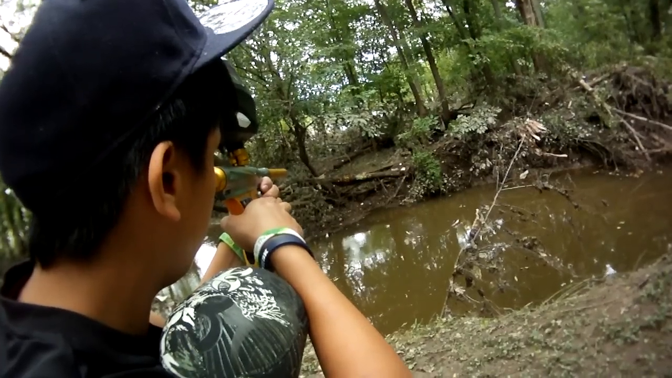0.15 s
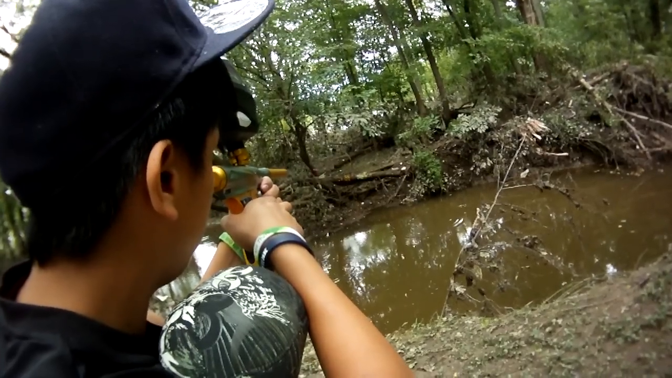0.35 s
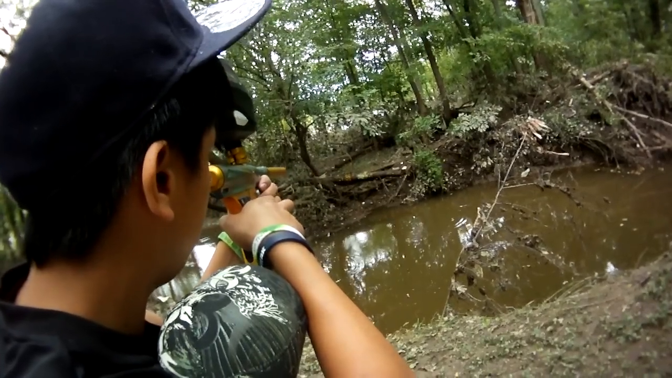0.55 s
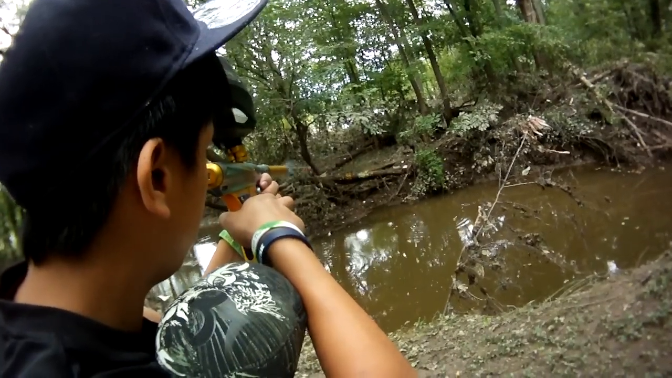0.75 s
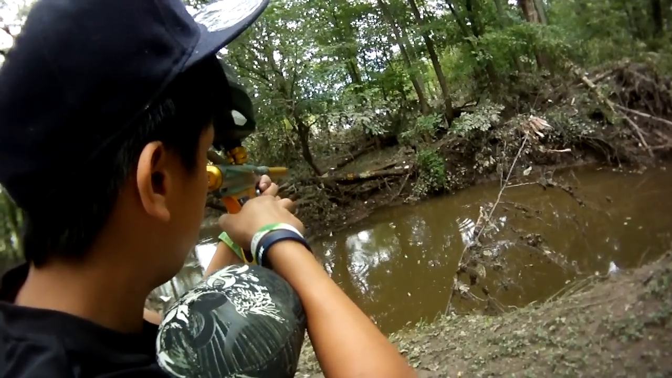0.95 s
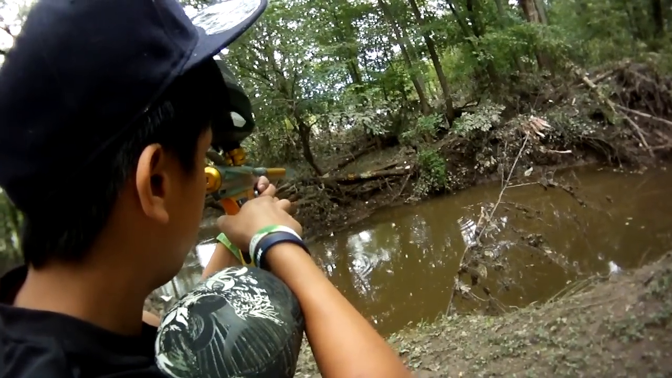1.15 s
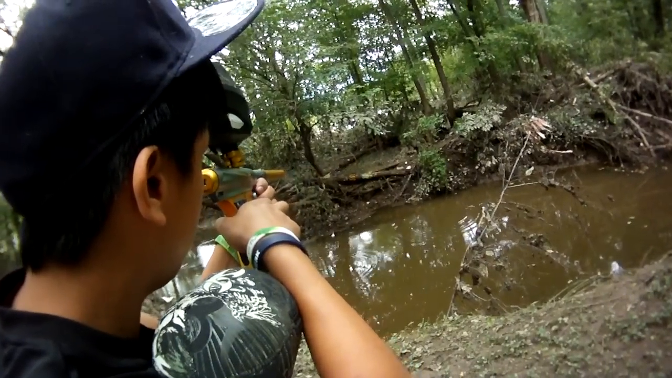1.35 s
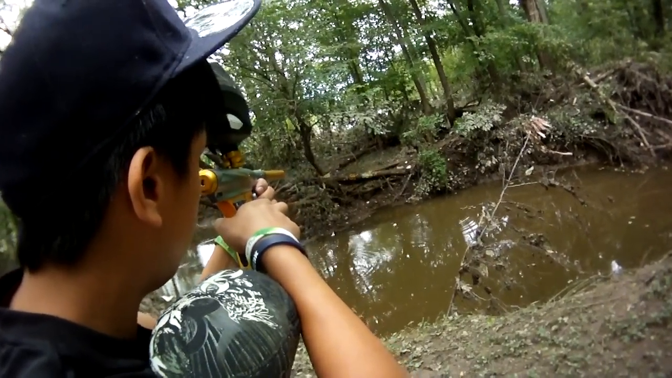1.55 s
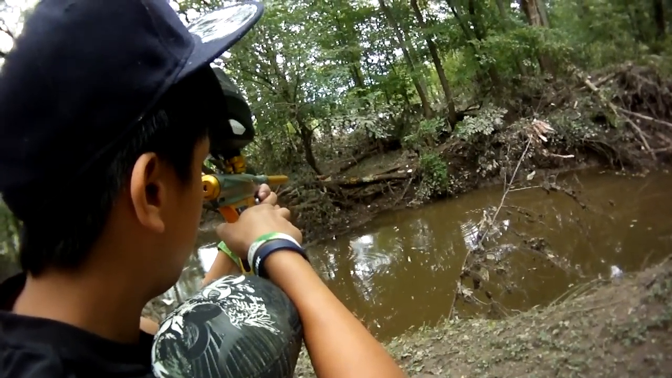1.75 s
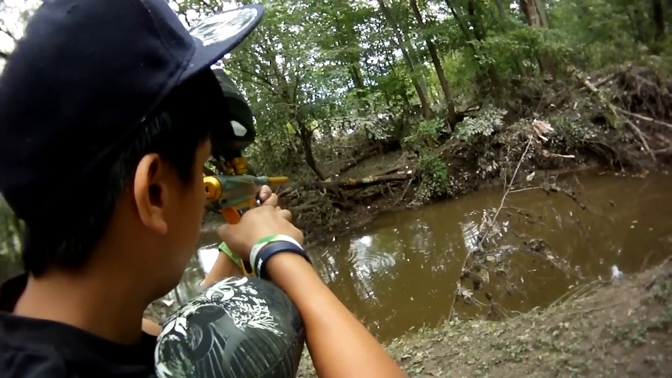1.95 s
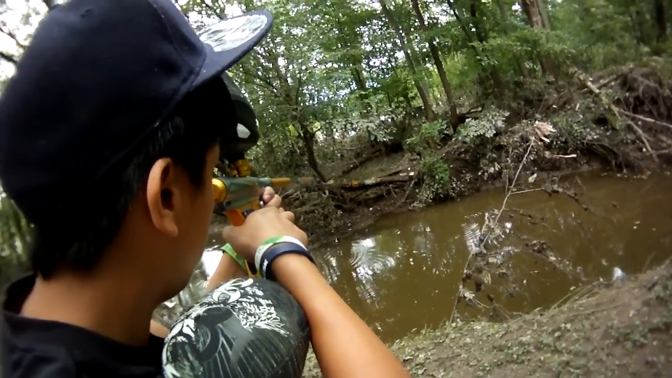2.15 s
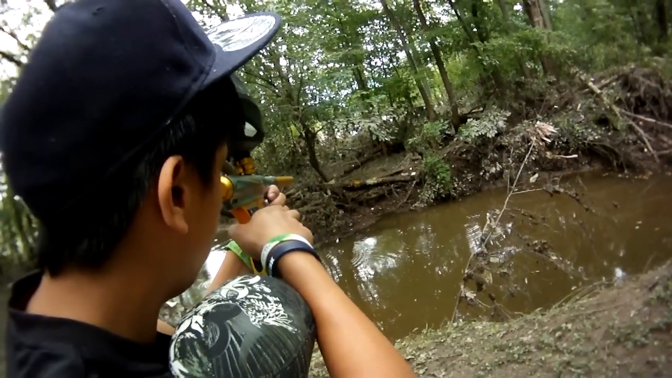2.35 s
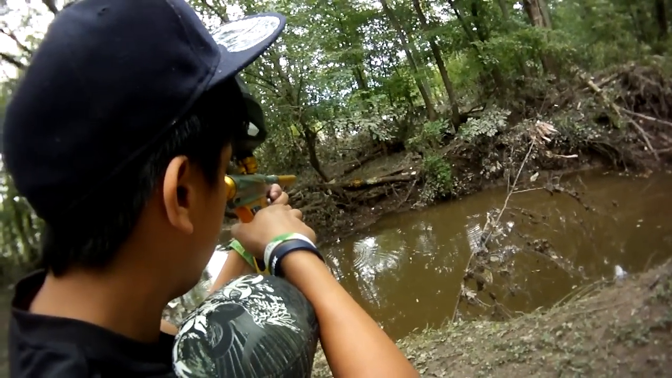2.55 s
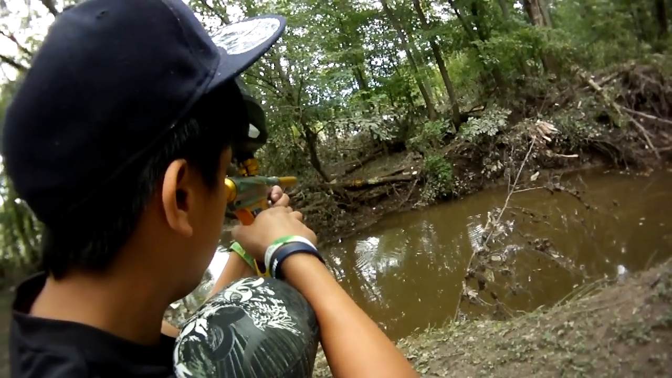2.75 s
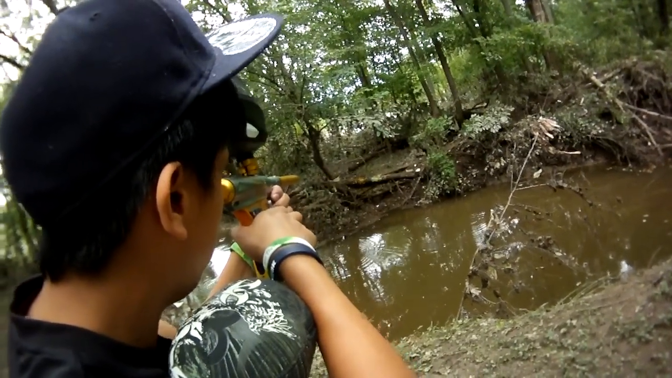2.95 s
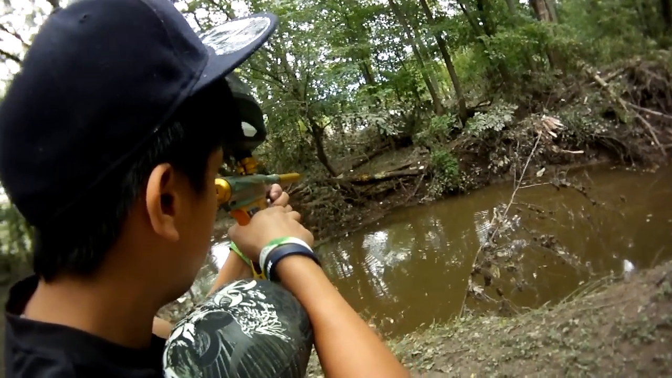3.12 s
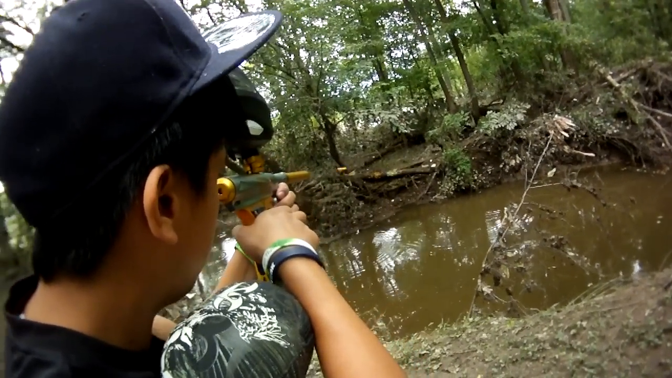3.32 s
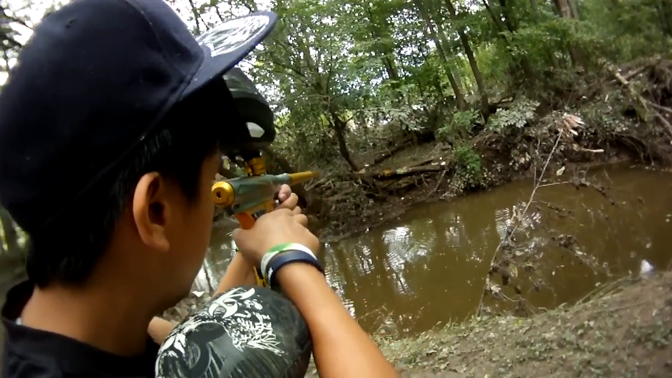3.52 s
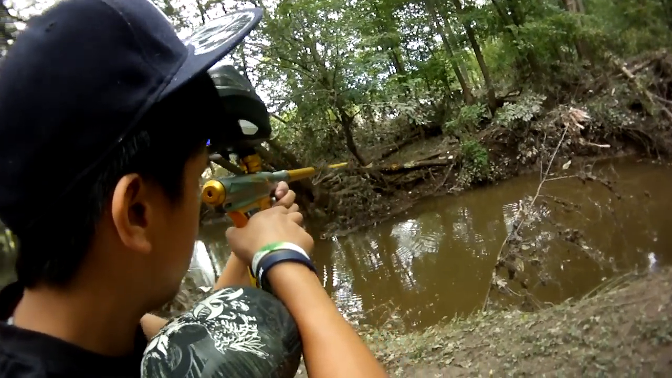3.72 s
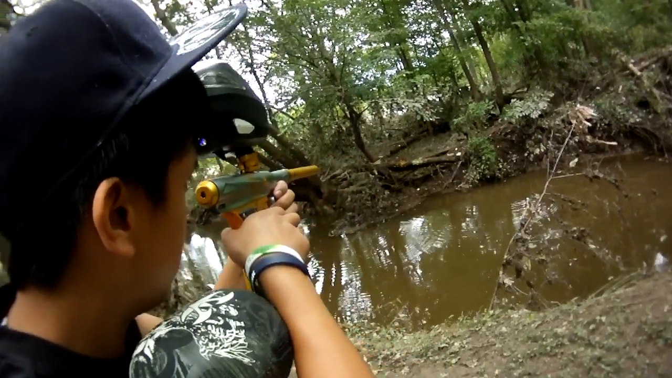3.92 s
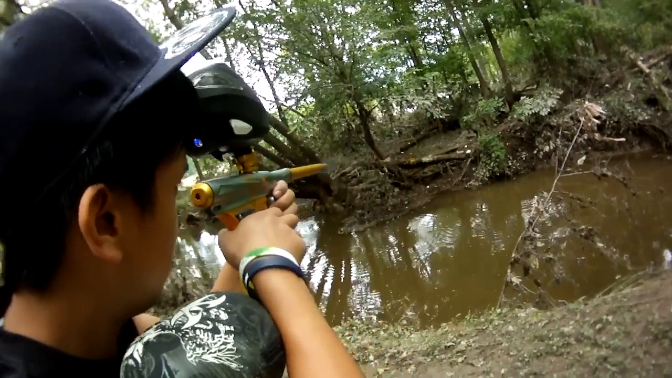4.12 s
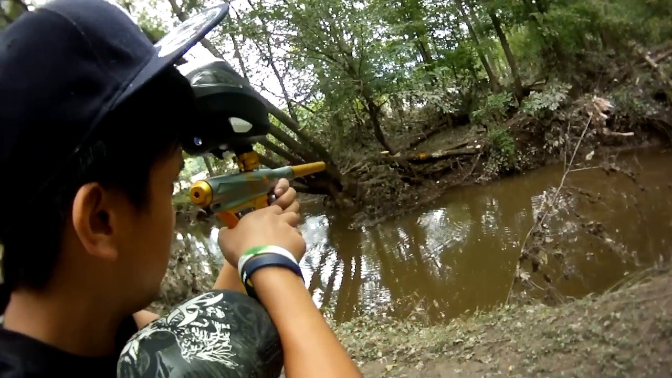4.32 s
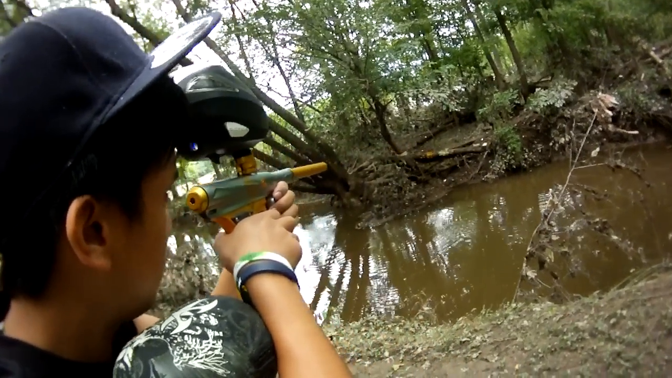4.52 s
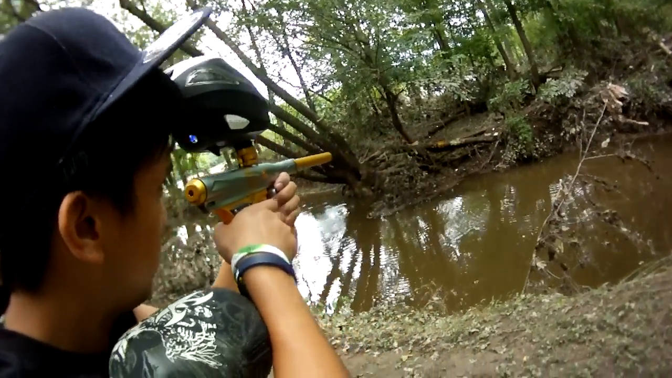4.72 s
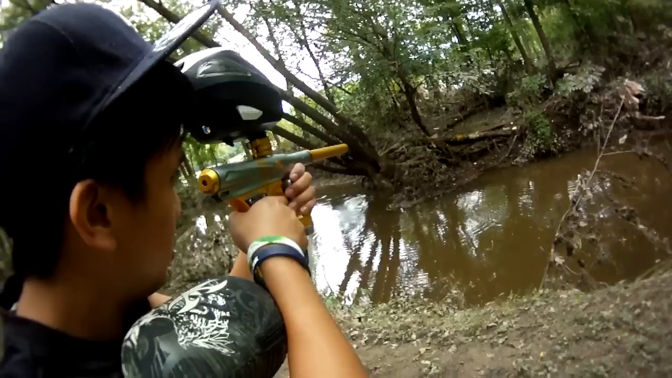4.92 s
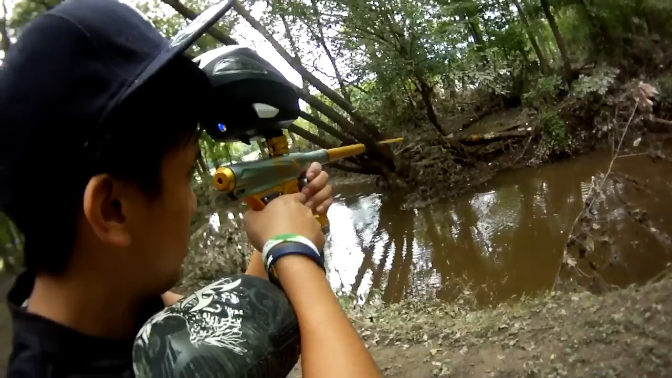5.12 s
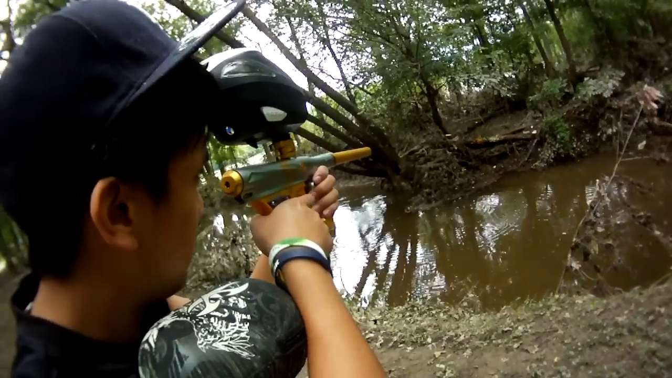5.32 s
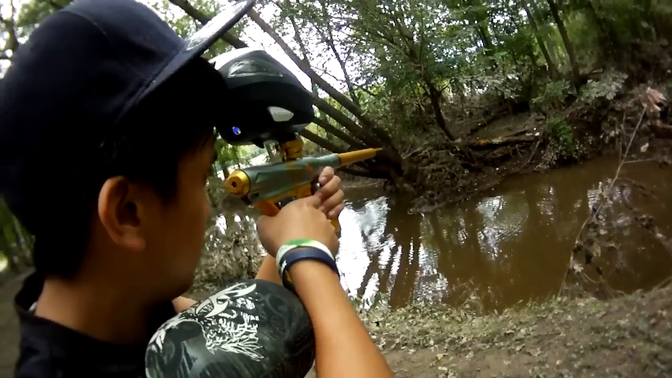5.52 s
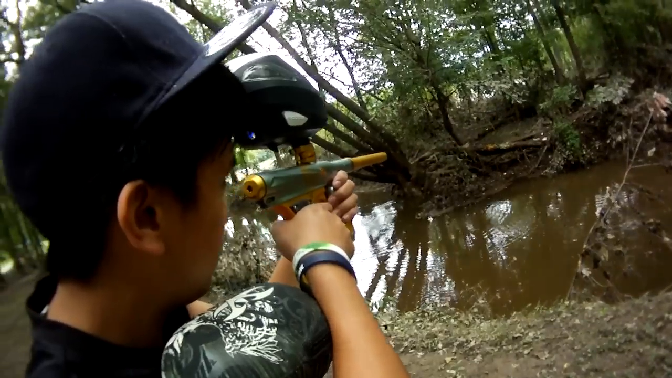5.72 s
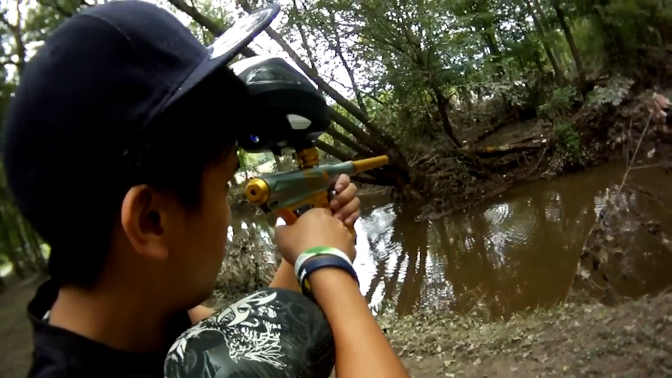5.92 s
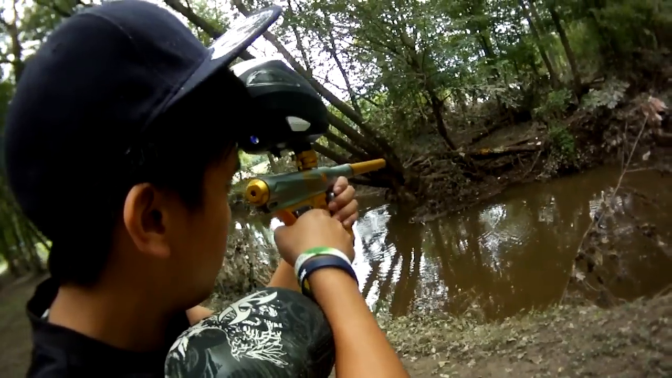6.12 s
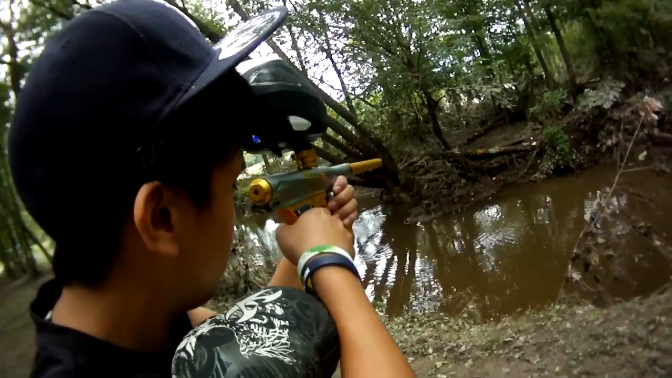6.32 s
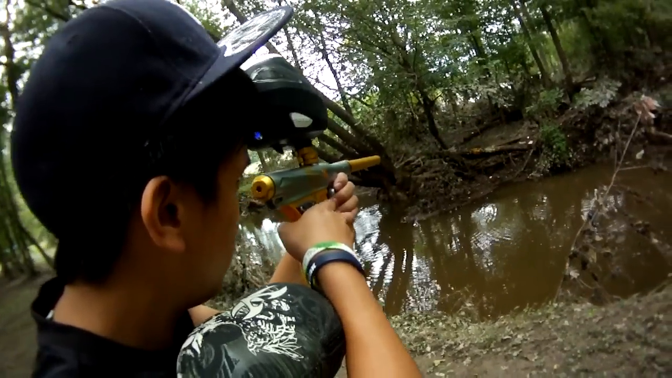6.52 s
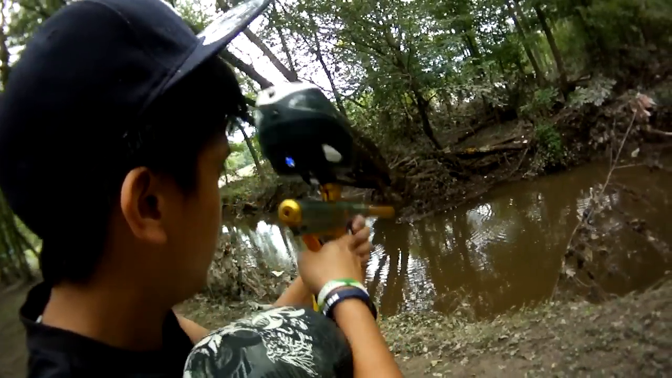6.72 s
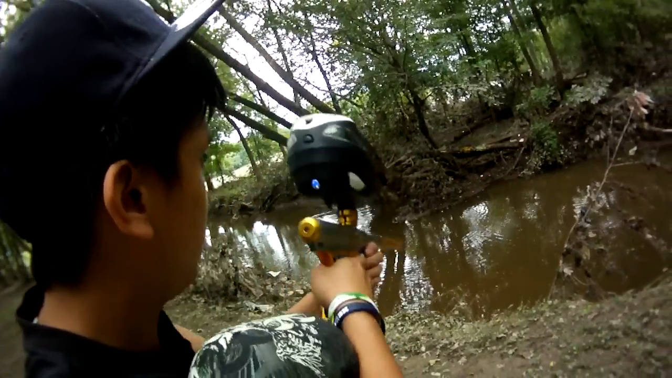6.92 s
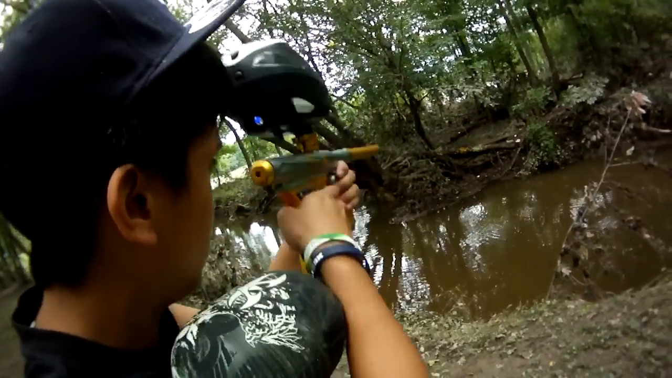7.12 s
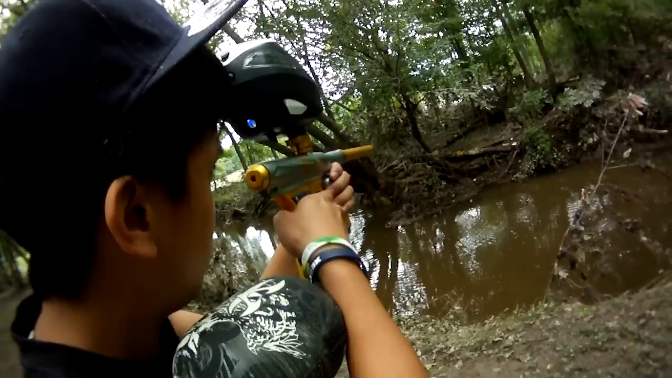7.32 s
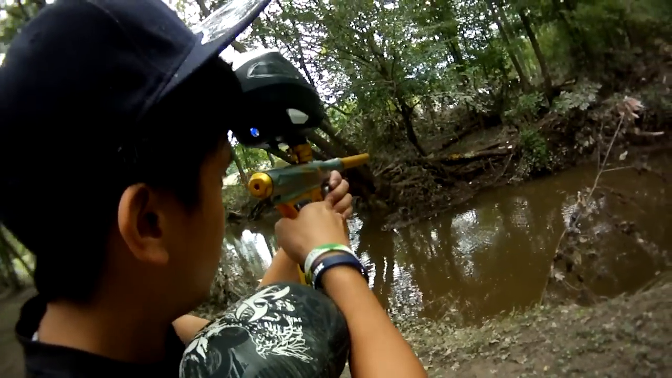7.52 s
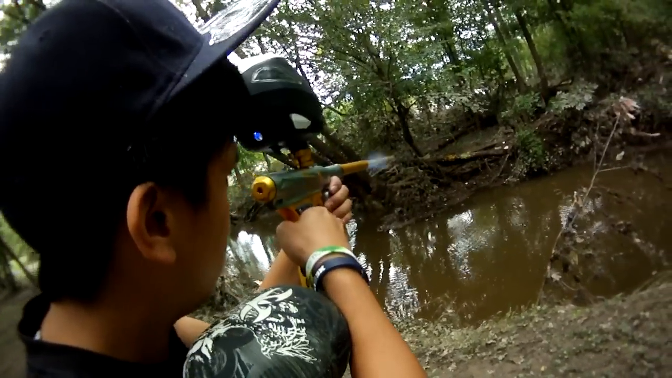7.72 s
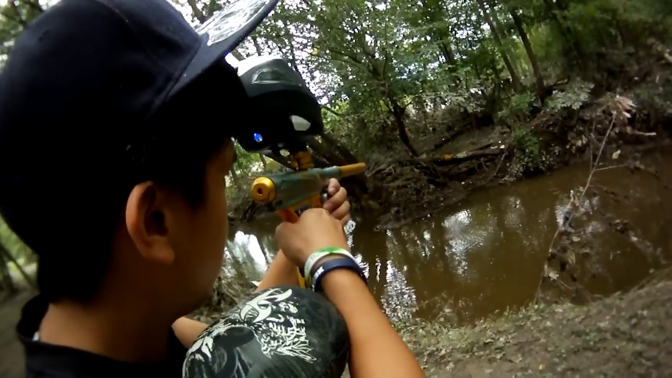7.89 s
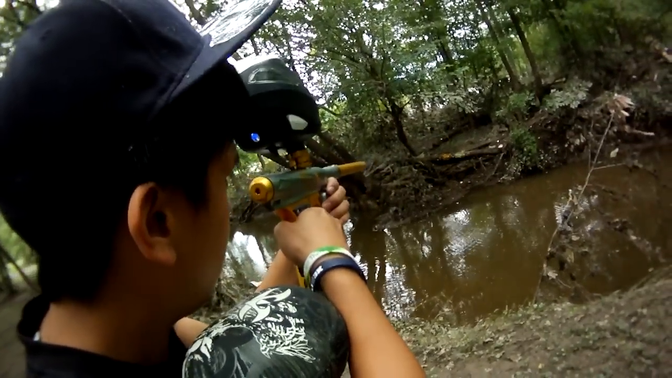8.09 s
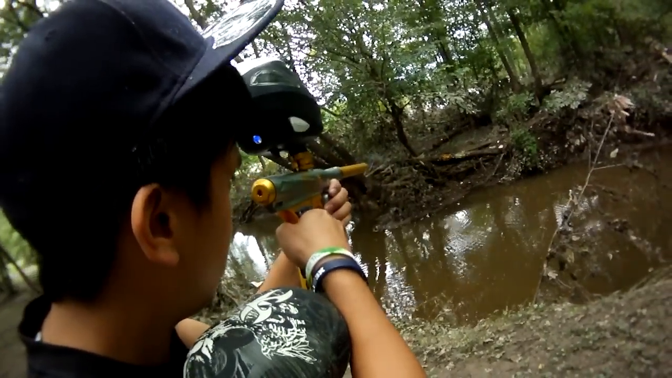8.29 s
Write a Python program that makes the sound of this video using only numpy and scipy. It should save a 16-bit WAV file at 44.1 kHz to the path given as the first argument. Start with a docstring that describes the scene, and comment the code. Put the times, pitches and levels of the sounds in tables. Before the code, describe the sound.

A steady machine-like run of compressed-air pops and bolt clacks begins at once, close to the microphone, with small splatting cracks farther off among the trees. It loses its beat briefly and ends abruptly. Near-quiet woods remain, with short echoes fading and light hopper rattles, before three punchier, hissing single shots ring out, spaced about a quarter second apart.

```python
"""A paintball marker fires twelve shots a second across a creek in the woods, falters and stops,
is tilted with faint ticks and rattles, then fires three harder single shots.
Each shot: the bolt thuds off and gas hisses, a chirp falls along the barrel, the muzzle pops, surges and
jets, the bolt clacks home; barrel and hopper ring on. Pulses, decaying sines and coloured noise make these.
Sparse echoes from earth, far bank and trees follow; some balls burst on wood. A faint hush runs throughout."""
import sys
import numpy as np
from scipy import signal
from scipy.fft import rfft, irfft
from scipy.io import wavfile

SR = 44100
rng = np.random.default_rng(int(sys.argv[2]) if len(sys.argv) > 2 else 0)


def inscribe(sig):
    """Save sig as 16-bit PCM at rate SR to the path in sys.argv[1].

    A 1-D sig is mono; a 2-D sig holds one channel per row.
    Samples are clipped to [-1, 1] before scaling.
    """
    pcm = np.round(np.clip(np.atleast_2d(sig).T, -1, 1) * 32767)
    wavfile.write(sys.argv[1], SR, pcm.astype(np.int16))


N = 368235
AGE_S = np.arange(6000) / SR  # time axis of every short sound

# Hush of the woods. Each row: frequency in Hz, relative density in dB per Hz.
AIR_COLOUR = [(25, -10.5), (70, 5.5), (140, -3), (220, -4), (500, 2.5), (800, -6), (1250, -9.5), (2500, -9),
              (3200, -13), (4100, -9.5), (5700, -19.5), (6900, -11.5), (9000, -20.5), (15500, -25)]
AIR_DB = -60.5
# Decay among the trees. Each row: frequency in Hz, t60 in seconds.
WOODS_T60 = [(100, 1), (500, 0.82), (2500, 1), (4500, 1), (8000, 1), (14000, 0.24)]
# Return from trunks and leaves. Each row: frequency in Hz, relative level in dB.
SCATTER_COLOUR = [(100, 3), (300, -2), (520, 2.5), (1000, 0.5), (2500, 0), (3700, 6.5), (4400, 3.5),
                  (5600, 5), (7000, 1.5), (12000, -9)]
# Dull reflections from the earth. Each row: delay in seconds, gain in dB.
GROUND_ECHOES = [(0.0089, -13), (0.027, -19.5)]

# Shifts of balls in the hopper and handling clicks at set times.
# Each row: start in seconds, level in dB, decay time constant in seconds.
RATTLES = [(6.798, -54, 0.026), (6.821, -47.5, 0.031), (7.275, -54.5, 0.033), (7.374, -56.5, .014),
           (7.953, -49, 0.0018)]
# Colour of the rattles. Each row: frequency in Hz, relative density in dB per Hz.
RATTLE_COLOUR = [(200, -13), (550, 5), (1100, -7), (2500, 0.5), (4200, -4.5), (5700, -11), (7000, -8),
                 (10000, -31), (15000, -32)]
# Faint ticks while the marker is tilted.
STIR_FROM_S, STIR_TO_S, STIR_DB, STIR_DECAY_S = 6.72, 7.26, -58, 0.0069

# Balls bursting on branches and the bank at set times, most of them loud.
# Each row: start in seconds, level in dB.
SPLATS = [(.547, -47), (.621, -45), (0.949, -40), (1.209, -42), (1.536, -41), (1.701, -42), (1.78, -40.5),
          (1.946, -43), (2.029, -41.5), (6.125, -45.5), (6.232, -54)]
# Colour of a bursting ball. Each row: frequency in Hz, relative density in dB per Hz.
SPLAT_COLOUR = [(300, -7), (1200, -14), (2500, 4), (3300, -1), (4100, 6), (5600, -9), (7000, -1),
                (9000, -22), (15000, -44)]
# Level of the other bursts, swelling over the first two seconds, then dropping back.
# Each row: time in seconds, level in dB.
HIT_LEVEL = [(0.0, -51), (2.1, -44), (2.3, -50), (6.0, -49)]
HIT_SHARE, FLIGHT_S, FLIGHT_SCATTER_S = 0.41, 0.37, 0.008  # share: chance of such a burst per shot

# Ring of the hollow hopper as it empties.
# Each row: time in seconds, level in dB against the surge, mean pitch in Hz.
HOLLOW = [(0.0, -10, 484), (2.0, -11, 493), (4.0, -11, 508), (5.5, 0, 527), (8.2, -6.5, 503)]
CLATTER_DB = -56  # mean
# Barrel tube: mean pitch, decay, level at the usual jet level, dB per dB of jet.
TUBE_HZ, TUBE_DECAY_S, TUBE_DB, TUBE_PER_JET = 2430, 0.03, -46, 2.5

# Thuds as the bolt sets off. Each row: delay in seconds, level in dB against the first, pitch in Hz.
STROKE = [(0.0, 0, 440), (0.0063, -5.5, 460)]
# Modes of the marker's body. Each row: mean frequency in Hz, mean relative level in dB, t60 in seconds.
BODY = [(1051, -13, 0.041), (1415, -25.5, 0.071), (1550, -26, 0.076), (2396, -15, 0.045), (2423, -28, 0.14),
        (2640, -22, 0.035), (3637, -4, 0.026), (3850, -3, 0.027), (4288, 2.5, 0.019), (4372, 1.5, 0.027),
        (4450, 4, 0.014), (6630, -4.5, 0.017), (7900, -21, 0.065)]
# Colour of the valve's hiss. Each row: frequency in Hz, relative density in dB per Hz.
VALVE_COLOUR = [(200, -72), (600, 5.5), (1050, 1.5), (1400, -9), (2500, 0.5), (3200, -4), (4300, 1.5),
                (5600, -16), (6800, 0.5), (8000, -9.5), (10000, -18), (15500, -61)]
# Colour of the bolt's clack. Each row: frequency in Hz, relative density in dB per Hz.
CLACK_COLOUR = [(200, -26.5), (600, 1.5), (1050, -10.5), (1300, -19), (1550, -6.5), (1850, -18.5),
                (2450, -2), (3100, -11.5), (4200, -4), (5600, -20.5), (7100, -8.5), (9000, -11),
                (11500, -25), (13000, -28), (15500, -69)]

# Surges of gas behind the ball. Each row: delay in seconds, relative level in dB, pitch in Hz.
SURGES = [(0.0, -1.5, 430), (0.0022, -9.5, 716), (0.0039, -12, 398)]
# Colour of the air jet. Each row: frequency in Hz, relative density in dB per Hz.
JET_COLOUR = [(200, -60), (700, -14), (1100, -10.5), (1300, -6), (1600, -4), (1900, -12), (2500, -0.5),
              (3200, -7), (4400, 1.5), (5700, -8), (6900, 5), (8500, -11.5), (10500, -20), (13000, -26.5),
              (15500, -73)]
# Muzzle hiss, narrow around its whistle. Each row: frequency in Hz, relative density in dB per Hz.
WHISTLE_COLOUR = [(4000, -25), (7600, -14), (8400, -3), (8800, 0), (9200, -21), (10200, -31), (15000, -43)]

FIRST_S, CYCLE_S, STREAM_COUNT = 0.0082, 0.082383, 69  # the steady stream
# Ordinary pops, sagging as the air supply tires. Each row: time in seconds, reference level in dB.
POP_LEVEL = [(0.0, -32.5), (1.1, -31.5), (1.6, -33.5), (2.0, -32.5), (3.0, -32), (4.2, -33), (4.6, -34),
             (5.6, -36)]
POP_SCATTER_DB, USUAL_POP_DB = 0.72, -31.5
# Harder shots of the stream. Each row: time in seconds, pop reference level in dB.
HARD_SHOTS = [(0.42, -29), (0.75, -30.5), (0.997, -29.7), (2.48, -29), (2.562, -27.5), (2.644, -28),
              (2.974, -27.8), (3.468, -29.5), (3.963, -27.5), (4.292, -29), (5.116, -29.5), (5.363, -31),
              (5.446, -31.5)]
# Shots off the beat, faltering and then single. Each row: pop in seconds, pop reference level in dB.
LOOSE_SHOTS = [(5.6935, -30.5), (5.7811, -31), (5.8791, -30.5), (7.7296, -25.5), (7.9901, -27.5),
               (8.215, -25.5)]
# Chirp: level at the usual pop, dB per dB of pop, gain after a pause, scatter.
CHIRP_DB, CHIRP_PER_POP, CHIRP_RESTED_DB, CHIRP_SCATTER_DB = -43, -0.6, 9.5, 2
# Surges behind a usual pop, easing in the stream. Each row: time in seconds, reference level in dB.
SURGE_LEVEL = [(0.0, -35), (2.5, -36), (5.6, -35.5)]
SURGE_PER_POP, SURGE_RESTED_DB = 0.43, 8.5  # dB per dB of pop, gain after a pause
# Jet, growing as the barrel swings out from behind the shooter's head.
# Each row: time in seconds, reference level in dB.
JET_LEVEL = [(0.0, -38), (1.95, -37.2), (2.2, -38.5), (2.9, -38.5), (3.15, -37), (3.7, -35.5), (4.5, -34),
             (5.4, -34), (8.2, -34.8)]
# Clack follows that swing less: reference level at the usual jet, dB per dB of jet, gain after a pause.
CLACK_DB, USUAL_JET_DB, CLACK_PER_JET, CLACK_RESTED_DB = -36, -33, 0.38, 4.5
# Body ring as the bolt comes home.
# Each row: time in seconds, reference level in dB, signed shot-to-shot scatter in dB.
RING_LEVEL = [(0.0, -26, 4.5), (1.99, -24.5, -1.5), (2.068, -30.5, -7.5), (3.0, -28, 1), (3.3, -27.5, 5),
              (5.8, -29.3, 6), (7.7, -29, 6)]


def amp(db):
    """Decibels to gain."""
    return 10 ** (np.asarray(db) / 20)


def at_time(points, s):
    """Straight-line reading of a two-column time table."""
    return np.interp(s, *np.transpose(points))


def read(points, hz):
    """A spectrum table on a log-frequency axis."""
    table_hz, value = np.transpose(points)
    return np.interp(np.log(hz + 1), np.log(table_hz), value)


def sized(x, db):
    """Gives a short sound the energy of 10 ms at this RMS level."""
    return amp(db) * x / np.sqrt(np.sum(x ** 2) / (SR / 100) + 1e-20)


def add(mix, start_s, sound):
    """Mixes a sound in at a time, trimmed at both ends of the scene."""
    at = round(start_s * SR)
    sound = sound[max(-at, 0):]
    part = mix[max(at, 0):][:len(sound)]
    part += sound[:len(part)]


def causal(points):
    """Minimum-phase response with this spectrum."""
    hz = abs(np.fft.fftfreq(2048, 1 / SR))
    log_gain = np.log(amp(read(points, hz)))
    spectrum = np.exp(np.conj(signal.hilbert(log_gain)))
    return np.fft.ifft(spectrum).real[:512]


def fall(decay_s, rise_s=1e-4):
    """An envelope that swells and dies exponentially."""
    return (1 - np.exp(-AGE_S / rise_s)) * np.exp(-AGE_S / decay_s)


def burst(envelope, colour, db):
    """A puff of turbulence or a spray of tiny contacts: enveloped noise in one colour."""
    noise = envelope * rng.standard_normal(len(AGE_S))
    return sized(signal.fftconvolve(noise, colour)[:len(AGE_S)], db)


def thud(hz, swell_s, db):
    """A pressure pulse: a sine under an envelope that peaks at twice its swell time."""
    u = AGE_S / swell_s
    return sized(-u ** 2 * np.exp(-u) * np.sin(2 * np.pi * hz * AGE_S), db)


def ring(db, uneven_db=3, detune=0.0043):
    """The body's modes decay as sines, struck a little differently each time."""
    hz, mode_db, t60_s = np.transpose(BODY)[:, :, None]
    strength, shift = rng.standard_normal((2, len(BODY), 1))
    gain = amp(mode_db + uneven_db * strength - 60 * AGE_S / t60_s)
    modes = gain * np.sin(2 * np.pi * hz * (1 + detune * shift) * AGE_S)
    return sized(modes.sum(0) * (1 - np.exp(-AGE_S / 0.0015)), db)


def air():
    """The faint steady hush of the woods: noise shaped in frequency."""
    gain = amp(read(AIR_COLOUR, np.fft.rfftfreq(N, 1 / SR)))
    hush = irfft(rfft(rng.standard_normal(N)) * gain, N)
    return amp(AIR_DB) * hush / np.std(hush)


def woods(x, tail_db=-22, bank_db=0, bank_s=0.074, bank_width_s=0.023, near_db=8, near_decay_s=0.0031):
    """Sparse echoes: undergrowth nearby, a cluster from the far bank, a tail from the trees."""
    taps = np.zeros(SR)
    at = np.arange(300, SR - 20, 20)
    taps[at + rng.integers(0, 20, len(at))] = rng.choice([-1., 1.], len(at))
    hz, t, z = signal.stft(taps, SR, nperseg=256)
    near = amp(near_db) * np.exp(-t / near_decay_s)
    bank = amp(bank_db) * np.exp(-((t - bank_s) / bank_width_s) ** 2)
    decay_db = 60 * t / read(WOODS_T60, hz)[:, None]
    z = z * (1 + near + bank) * amp(read(SCATTER_COLOUR, hz)[:, None] - decay_db)
    tail = signal.istft(z, SR, nperseg=256)[1]
    return amp(tail_db) * signal.fftconvolve(x, tail / np.linalg.norm(tail))[:N]


def ground(x, soft_hz=600):
    """Soft earth returns mainly the low part of each sound."""
    dull = signal.lfilter(*signal.butter(1, soft_hz, fs=SR), x)
    out = np.zeros(N)
    for delay_s, db in GROUND_ECHOES:
        add(out, delay_s, amp(db) * dull)
    return out


def rattles(count=7):
    """Hopper and grip stir in handling: short puffs of plastic-coloured noise."""
    out, plastic = np.zeros(N), causal(RATTLE_COLOUR)
    ticks = [(s, STIR_DB, STIR_DECAY_S) for s in rng.uniform(STIR_FROM_S, STIR_TO_S, count)]
    for s, db, decay_s in list(RATTLES) + ticks:
        add(out, s, burst(fall(decay_s, rise_s=0.00047), plastic, db))
    return out


def splats(shots):
    """Balls crack open on wood across the water and spatter: a sharp burst with a weaker tail."""
    out, shell = np.zeros(N), causal(SPLAT_COLOUR)
    flight_s = FLIGHT_S + FLIGHT_SCATTER_S * rng.standard_normal(STREAM_COUNT)
    arrivals = shots[:STREAM_COUNT, 0] + flight_s
    hits = arrivals[rng.random(STREAM_COUNT) < HIT_SHARE]
    others = [(s, at_time(HIT_LEVEL, s)) for s in hits]
    envelope = fall(0.0029, rise_s=0.00032) + 0.16 * fall(0.021, rise_s=0.002)
    for s, db in list(SPLATS) + others:
        add(out, s, burst(envelope, shell, db))
    return out


def hopper(shots, spread_db=2, count=5):
    """Each shot rings the hollow shell and jostles the balls queuing inside it."""
    out, plastic = np.zeros(N), causal(CLACK_COLOUR)
    when, hollow_db, hollow_hz = np.transpose(HOLLOW)
    for s, _, _, surge_db, *_ in shots:
        hz = np.interp(s, when, hollow_hz) * (1 + 0.037 * rng.standard_normal())
        hum = fall(0.0057, rise_s=0.004) * np.sin(2 * np.pi * hz * AGE_S)
        add(out, s + 0.00341, sized(hum, surge_db + np.interp(s, when, hollow_db)))
        for _ in range(count):
            delay_s = rng.uniform(0.025, 0.07)
            db = CLATTER_DB + spread_db * rng.standard_normal()
            add(out, s + delay_s, burst(fall(0.0068, rise_s=0.00042), plastic, db))
    return out


def barrel(shots, detune=0.0032):
    """The metal tube rings on between shots, clearer as it swings into the open."""
    out = np.zeros(N)
    for s, _, _, _, jet_db, *_ in shots:
        hz = TUBE_HZ * (1 + detune * rng.standard_normal())
        tone = fall(TUBE_DECAY_S, rise_s=0.0022) * np.sin(2 * np.pi * hz * AGE_S)
        add(out, s, sized(tone, TUBE_DB + TUBE_PER_JET * (jet_db - USUAL_JET_DB)))
    return out


def bolt(shots):
    """The valve sends the bolt forward; it comes back with a clack and one bounce."""
    out, valve, clack = np.zeros(N), causal(VALVE_COLOUR), causal(CLACK_COLOUR)
    for s, _, pop_db, _, _, clack_db, ring_db, full in shots:
        early_s, late_s = 0.0003 * rng.standard_normal(2)
        start_s = s - (0.0162 if full else 0.0195) + early_s
        home_s = s + (0.0161 if full else 0.0134) + late_s
        push_db = 0.17 * (pop_db + 14.5) + 3 * full  # more pressure, harder stroke
        for delay_s, db, hz in STROKE:
            add(out, start_s + delay_s, thud(hz, 0.00095, db + push_db - 34.5))
        add(out, start_s + 0.0005, burst(fall(0.024, rise_s=0.000098), valve, push_db - 39.5))
        add(out, start_s + 0.0075, ring(push_db - 44.5))
        add(out, home_s - 0.0008, thud(450, 0.00061, push_db - 35.5))
        add(out, home_s, burst(fall(0.0039, rise_s=0.00016), clack, clack_db + 1.0))
        add(out, home_s, ring(ring_db - 5.0))
        # bounce
        add(out, home_s + 0.0055, ring(clack_db - 8.5))
        add(out, home_s + 0.0059, burst(fall(0.0076, rise_s=0.00094), clack, clack_db - 11.0))
    return out


def chirp(db, start_hz=3900, end_hz=1750, glide_s=0.0021, length_s=0.0057):
    """The air ahead of the ball squeals downward as the ball runs along the barrel."""
    glide_hz = end_hz + (start_hz - end_hz) * np.exp(-AGE_S / glide_s)
    hz = glide_hz * (1 + 0.029 * rng.standard_normal())
    window = np.sin(np.pi * np.minimum(AGE_S / length_s, 1)) ** 2
    return sized(window * np.sin(2 * np.pi * np.cumsum(hz) / SR), db)


def muzzle(shots):
    """Chirp, pop, surges of gas and the hissing jet behind the ball."""
    out, jet, nozzle = np.zeros(N), causal(JET_COLOUR), causal(WHISTLE_COLOUR)
    for s, chirp_db, pop_db, surge_db, jet_db, _, _, full in shots:
        add(out, s - 0.0046, chirp(chirp_db))
        pop_hz = 385 * (1 + 0.02 * rng.standard_normal())
        add(out, s - 0.002, thud(pop_hz, 0.001, pop_db + 3))
        # the released air pushes outward
        push = (1 - AGE_S / 0.0015) * fall(0.0018, rise_s=0.00048)
        add(out, s - 0.001, sized(push, pop_db - 13.0))
        surge_s = s + (0.0039 if full else 0.0054)
        for delay_s, db, hz in SURGES:
            jitter_s = 0.0002 * rng.standard_normal()
            surge = thud(hz, 0.37 / hz, surge_db + db + 2.0)
            add(out, surge_s + delay_s - 0.78 / hz + jitter_s, surge)  # lead lets it swell up
        add(out, s - 0.0012, burst(fall(0.012, rise_s=0.0042), jet, jet_db - 1.0))
        # the jet peaks as the ball clears the barrel
        add(out, s + 0.0027, burst(fall(0.001, rise_s=0.00045), jet, jet_db - 0.5))
        add(out, s + 0.0066, burst(fall(0.0008, rise_s=0.00039), jet, jet_db - 10.5))
        if full:  # at full pressure the jet whistles
            add(out, s + 0.0028, burst(fall(0.0016, rise_s=0.00058), nozzle, jet_db + 0.19))
    return out


def rested(times_s):
    """Shots after a pause start from a full chamber and cycle differently."""
    return np.diff(times_s, prepend=0) > 0.15


def firing():
    """Each row: pop in seconds, chirp, pop, surge, jet, clack and body ring in dB, chamber full 0/1."""
    beat_s = FIRST_S + CYCLE_S * np.arange(STREAM_COUNT)
    pop_db = at_time(POP_LEVEL, beat_s) + POP_SCATTER_DB * rng.standard_normal(STREAM_COUNT)
    for hard_s, db in HARD_SHOTS:
        pop_db[np.argmin(abs(beat_s - hard_s))] = db
    stream = np.column_stack([beat_s, pop_db])
    s, pop_db = np.vstack([stream, LOOSE_SHOTS]).T
    full = rested(s)
    force_db = pop_db - USUAL_POP_DB
    chirp_luck, ring_luck = rng.standard_normal((len(s), 2)).T
    # a harder pop drives stronger surges and a weaker chirp
    chirp_db = CHIRP_DB + CHIRP_PER_POP * force_db + CHIRP_RESTED_DB * full + CHIRP_SCATTER_DB * chirp_luck
    surge_db = at_time(SURGE_LEVEL, s) + SURGE_PER_POP * force_db + SURGE_RESTED_DB * full
    jet_db = at_time(JET_LEVEL, s)
    clack_db = CLACK_DB + CLACK_PER_JET * (jet_db - USUAL_JET_DB) + CLACK_RESTED_DB * full
    when, level_db, scatter_db = np.transpose(RING_LEVEL)
    ring_db = np.interp(s, when, level_db) + np.interp(s, when, scatter_db) * np.minimum(ring_luck, 1)
    return np.column_stack([s, chirp_db, pop_db, surge_db, jet_db, clack_db, ring_db, full])


def scene():
    """Everything but the hush sounds over the ground and into the trees."""
    shots = firing()
    surroundings = rattles() + splats(shots)
    marker = hopper(shots) + barrel(shots) + bolt(shots) + muzzle(shots)
    direct = surroundings + marker
    return (air() + woods(direct) + ground(direct) + direct)[None]


def record(dry, low_cut_hz=45, edge_hz=15600):
    """The microphone's low cut and the recorder's band limit."""
    lean = signal.lfilter(*signal.butter(1, low_cut_hz, "highpass", fs=SR), dry)
    band_limit = signal.firwin(511, edge_hz, window=("kaiser", 9), fs=SR)
    return signal.oaconvolve(lean, band_limit[None], "same")


dry = scene()
out = record(dry)
inscribe(out)
```